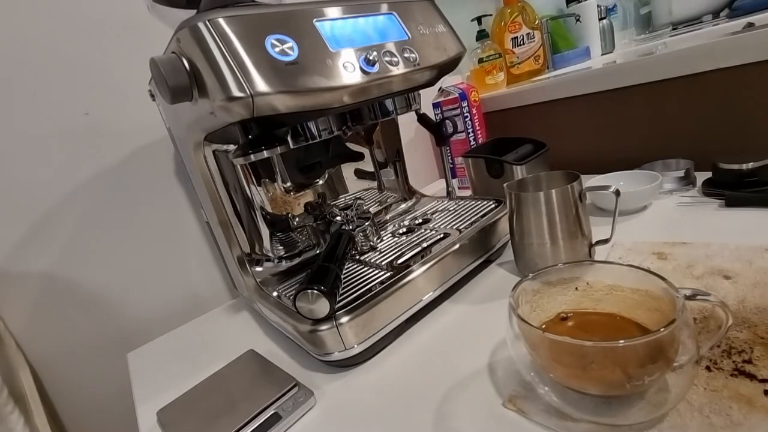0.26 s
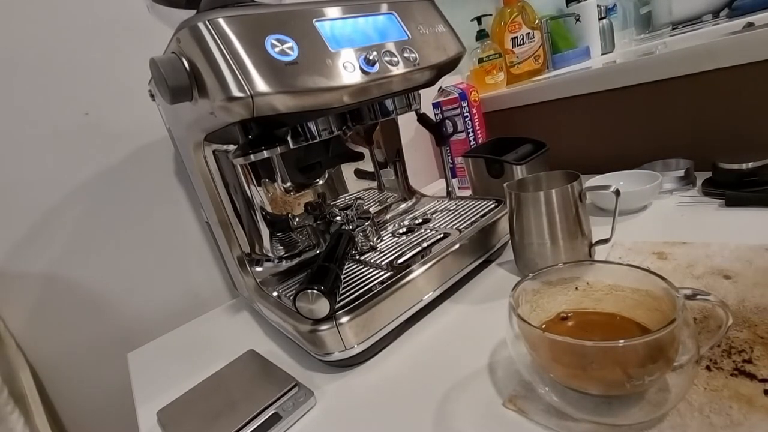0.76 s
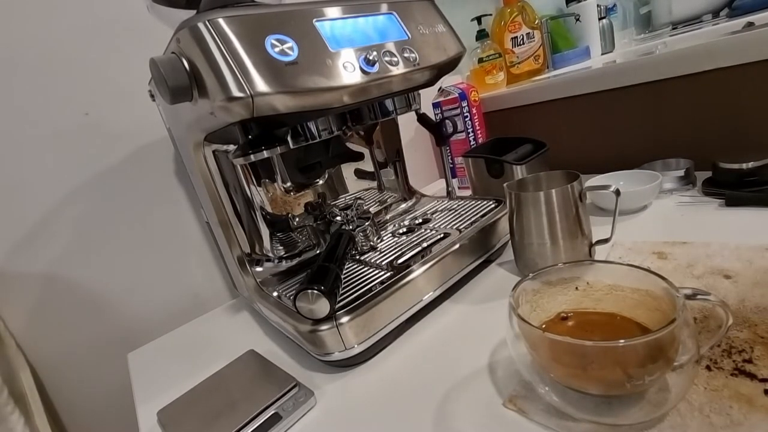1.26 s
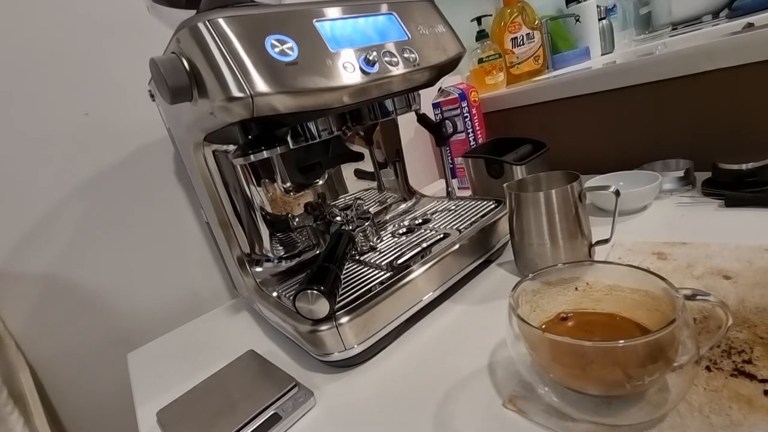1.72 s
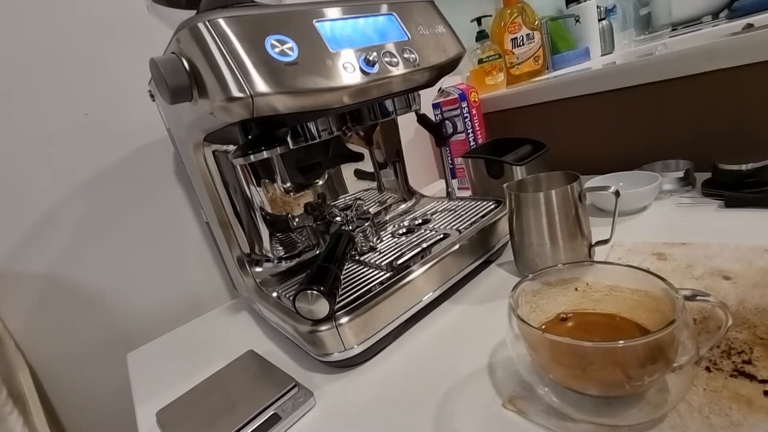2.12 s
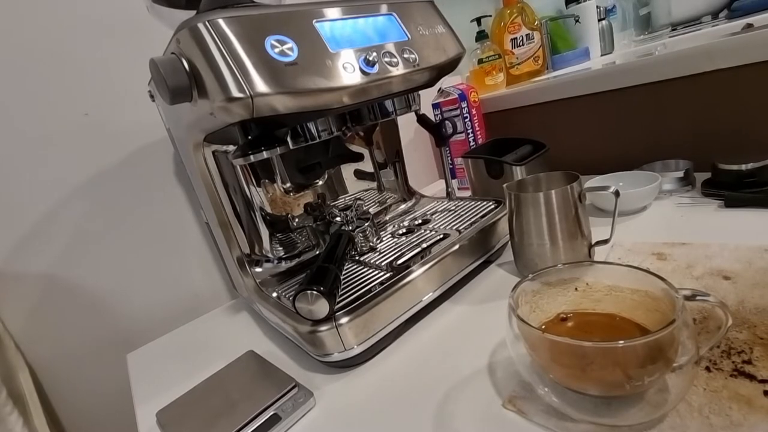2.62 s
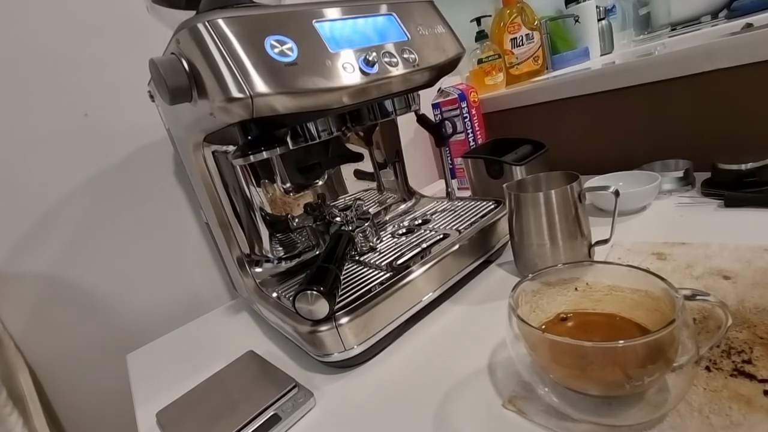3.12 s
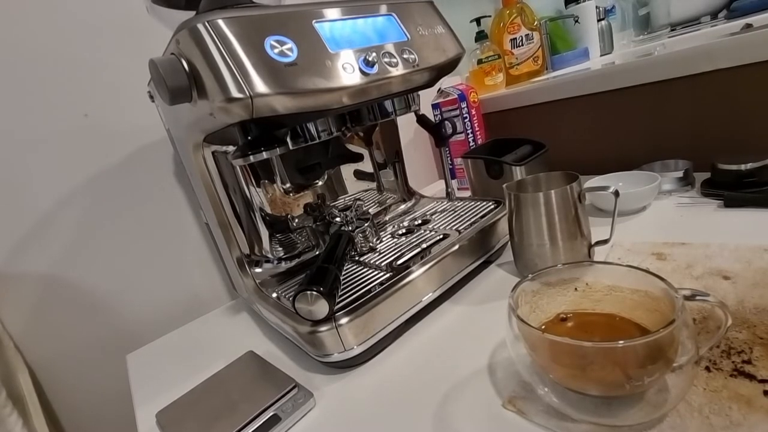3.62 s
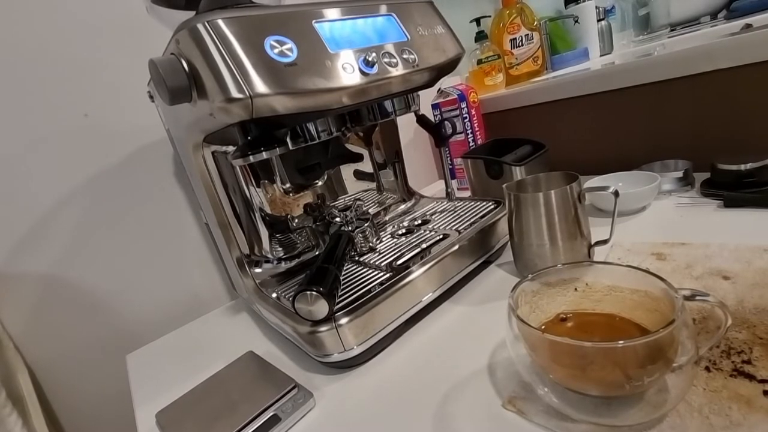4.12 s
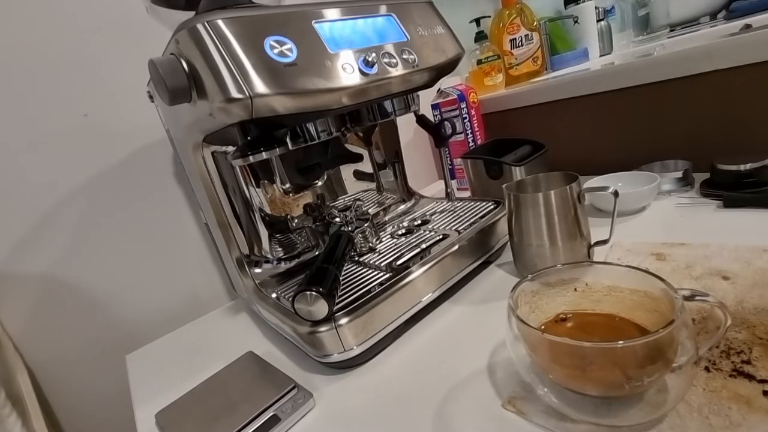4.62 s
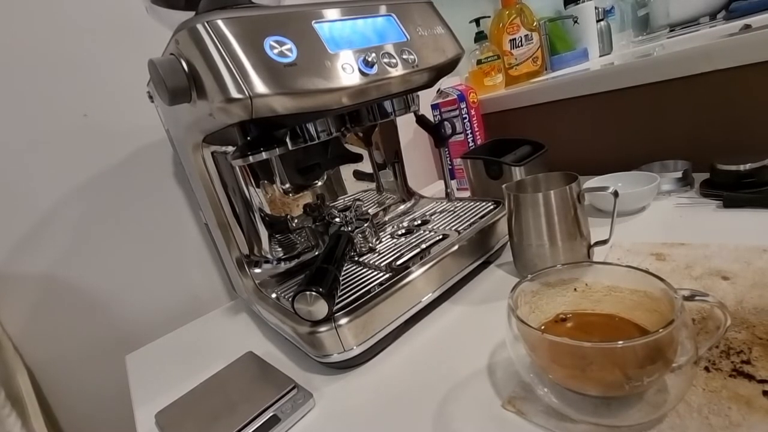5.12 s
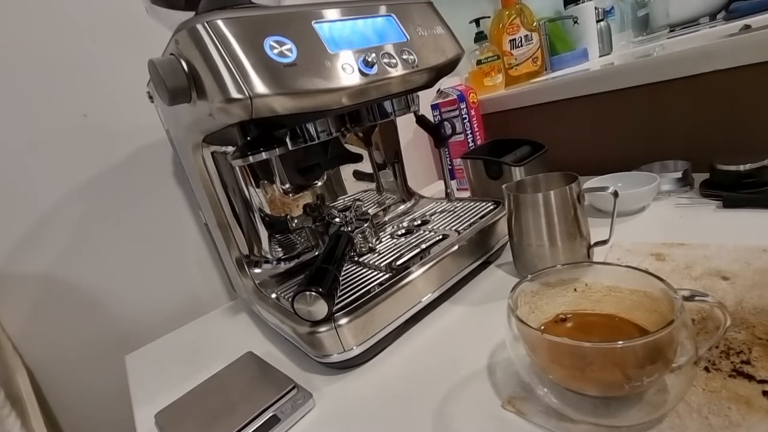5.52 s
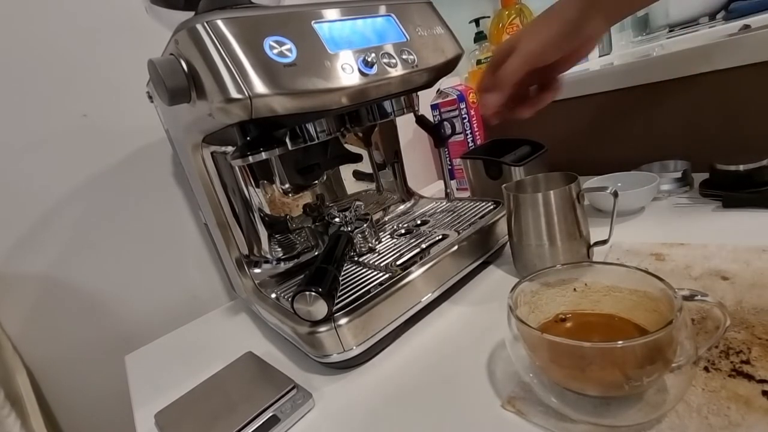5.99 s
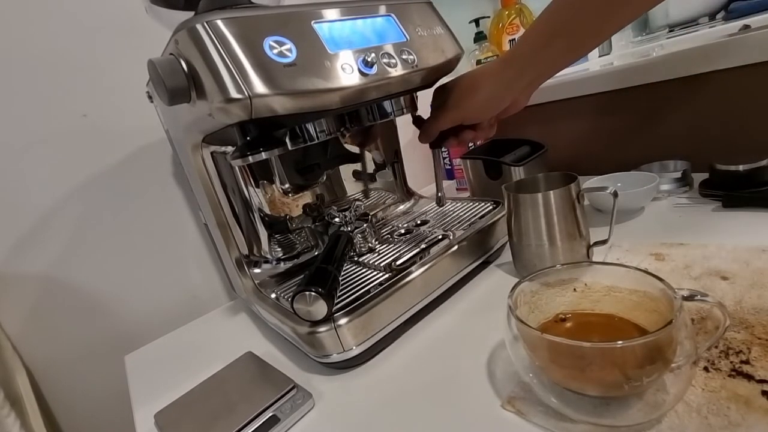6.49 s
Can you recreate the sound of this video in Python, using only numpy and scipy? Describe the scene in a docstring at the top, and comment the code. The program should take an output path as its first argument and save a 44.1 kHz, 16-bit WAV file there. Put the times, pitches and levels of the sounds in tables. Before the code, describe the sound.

Close in a kitchen, rattly metallic pump knocks pulse steadily as wet steam sputters grow denser and finally break into a roaring, bright hiss.

```python
"""A kitchen counter, where an espresso machine heats up. Its pump knocks twice a second as contacts strike
a ringing casing. Bubbles in the heater simmer as lumpy low noise under a breathy whine, and hot metal ticks.
The wand seeps and spits more and more often, shaped noise and ringing drops in the resonances of its pipe,
and at last it blows a loud jet of steam. Steady air noise and a mains hum lie quietly behind."""
import sys
import numpy as np
from scipy import signal
from scipy.fft import rfft, irfft, next_fast_len
from scipy.io import wavfile

SR = 44100
rng = np.random.default_rng(int(sys.argv[2]) if len(sys.argv) > 2 else 0)


def generate_wav(signal):
    """Clip the signal to [-1, 1] and save it as 16-bit WAV at the path in sys.argv[1]."""
    frames = np.transpose(np.atleast_2d(signal))
    scaled = np.clip(frames, -1, 1) * 32767
    pcm = np.round(scaled).astype(np.int16)
    wavfile.write(sys.argv[1], SR, pcm)


def boost_factor(decibels):
    """Convert a level in decibels to a linear amplitude factor."""
    exponent = np.asarray(decibels, float) / 20
    return 10 ** exponent


N = 297675
TIME = np.arange(N) / SR
SIDES = np.array([[1], [-1]])   # left, right

# Noise tones give only the shape of a spectrum: the noise is levelled afterwards.
# Balances are left over right.

# Pump
FIRST_STROKE_S, STROKE_EVERY_S, STROKE_DB = 1.469, 0.50037, -32.5
# delay of the piston's return by back pressure, stroke by stroke: late_ms
RETURN_LATE_MS = [6.19, 3, 2.97, 2.43, 6.6, 4.58, 6, 5.6, 5.98, 5.44, 5.14]
# contacts in one stroke: after_start_ms, signed push on the casing, knock_db, tick_db, share of the delay (0-1)
CONTACTS = [(1.97, -0.73, -2.5, -10.5, 0.19), (6.03, 0.07, 2, -31, 0.05), (13.31, 0.47, -0.5, -24, 0.14),
            (21.03, -1.19, 4.5, -12, 0.13), (27.18, 1, 2.5, -39, 0.94), (38.22, -0.18, -4, -25.5, 0.24),
            (47.45, 1, -7.5, -30, 0.14), (56.06, -0.17, -3, -40, 0.66), (63.05, 0.74, -7.5, -37, 0.11)]
# low thump of the casing, driven by the pump coil: pitch_hz, level_db, t60_s
CASING_MODES = [(48, 0, 0.061), (94.5, -9, 0.23)]
# ringing panels: pitch_hz, level_db, t60_s
PANEL_MODES = [(146, -18.5, 0.12), (191.6, -15, 0.18), (222, -9, 0.2), (259, -18.5, 0.088),
               (289.8, -13, 0.12), (364, -13.5, 0.12), (421.2, -9, 0.26), (479, -8.5, 0.058),
               (552.6, -9, 0.074), (616, -2.5, 0.027), (707, -8.5, 0.062), (747, -8, 0.041),
               (854, -16.5, 0.077), (967, -15, 0.024), (1117, -23.5, 0.1), (1270, -25.5, 0.081),
               (1443, -28.5, 0.092), (1744, -23, 0.063)]
# valve rattle: freq_hz, level_db (per Hz)
VALVE_TONE = [(200, -10), (600, 4.5), (1100, 7), (2000, 0.5), (4000, 4.5), (5500, -1.5), (8000, -6.5),
              (15000, -15.5)]
# pump balance: freq_hz, balance_db
PUMP_BALANCE = [(60, -8.5), (110, 8.5), (200, -12), (380, 0), (700, -4), (1290, -2), (2380, -2), (4400, -4),
                (8120, 0.0), (15000, 0.0)]
# water hammer as the piston returns; its level is over the stroke strength
HAMMER_AFTER_MS, HAMMER_HZ, HAMMER_SWELL_MS, HAMMER_DB = 20.5, 590, 4.5, 3

# Wand
# steam leaving the wand: time_s, rush_db in the pipe, fizz_db at the tip
STEAM_LEVELS = [(0.0, -59.5, -47), (0.09, -60.5, -62.5), (0.3, -65.5, -70.5), (0.48, -75.5, -81),
                (0.8, -76.5, -80), (1.1, -85, -80), (1.26, -73.5, -77), (2.3, -69.5, -75.5),
                (2.9, -64, -72), (3.8, -60.5, -70), (4.15, -59, -67), (4.9, -61, -68.5),
                (5.2, -58.5, -65.5), (6.3, -58.5, -64.5)]
# spits of water: start_s, rush_db, fizz_db, gurgle_db, t60_s
SPITS = [(0.353, -57.5, -69, -68, 0.041), (1.217, -51, -71, -51.5, 0.061), (2.778, -52.5, -60, -54.5, 0.27),
         (2.865, -50, -67, -47.5, 0.065), (3.0094, -56, -47, -40, 0.064), (3.04, -55, -57, -46.5, 0.17),
         (3.0794, -54, -72, -59, 0.06), (3.167, -56.5, -62, -44, 0.049), (3.228, -56, -52, -50.5, 0.13),
         (3.2504, -55, -43, -61, 0.049), (3.268, -55, -52, -54, 0.07), (3.584, -48, -76, -44.5, 0.067),
         (3.6986, -50, -59, -41, 0.061), (3.878, -42.5, -52, -67, 0.15), (3.921, -56, -62, -49, 0.27),
         (4.0474, -49, -64, -47, 0.051), (4.13, -40, -48, -47, 0.059), (4.1835, -49.5, -54, -51, 0.12),
         (4.213, -49, -73, -61, 0.1), (4.327, -50.5, -47, -52, 0.1), (4.352, -49, -57, -56, 0.063),
         (4.6194, -61, -49, -54, 0.03), (4.6994, -58, -63, -40.5, 0.066), (4.928, -51, -67, -47, 0.081),
         (5.102, -54, -63, -45.5, 0.075), (5.1562, -50, -55, -52, 0.05), (5.1994, -43, -53, -45, 0.11),
         (5.2394, -54, -56, -56, 0.095), (5.3414, -42, -71, -45, 0.033), (5.3795, -40.5, -52, -41.5, 0.071),
         (5.431, -43, -64, -47, 0.048), (5.576, -46, -67, -48.5, 0.14), (5.659, -40, -52, -46.5, 0.092),
         (5.6836, -47, -51, -50, 0.075), (5.852, -49, -57, -45.5, 0.19), (6.1055, -51, -52, -56, 0.08),
         (6.1953, -49.5, -52, -45, 0.083), (6.2594, -50, -68, -50, 0.082), (6.336, -42, -43, -43, 0.046)]
# rush of a spit: freq_hz, level_db (per Hz)
RUSH_TONE = [(590, -36), (1000, -25), (1310, -4), (1540, -13), (1770, -2.5), (2030, -2.5), (3120, -2),
             (4340, -3.5), (5700, -9), (6440, -5), (8500, -10.5), (11000, -50), (18700, -120)]
# smooth seep of steam: freq_hz, level_db (per Hz)
SEEP_TONE = [(590, -29), (1000, -0.5), (1080, -4), (1200, -17), (1490, -8), (1750, -17), (2870, -12),
             (3230, -8), (5030, -17.5), (11000, -26.5), (14300, -67), (22000, -120)]
# fizz at the tip: freq_hz, level_db (per Hz)
FIZZ_TONE = [(6000, -3.5), (8500, -9), (10000, -6.5), (11000, -6.5), (13500, 0), (15500, -5)]
# gurgling slugs of water: freq_hz, level_db (per Hz)
GURGLE_TONE = [(300, -32), (450, 2.5), (600, 5), (800, 4), (1300, -14.5), (1800, -13), (2600, -4.5),
               (4000, -47)]
# wand resonances, as strong as in a spit: centre_hz, width_hz, lift_db
PIPE = [(1310, 150, 5), (2290, 200, 6), (2970, 90, 5), (3250, 300, 8), (5200, 250, 5), (6450, 400, 8),
        (7600, 200, 3), (9630, 100, 3)]
# steam balance: freq_hz, balance_db
STEAM_BALANCE = [(60, -3.5), (130, -1.5), (290, -10), (640, -1), (1410, 2), (3100, -1), (6820, -1),
                 (15000, 1)]
# each pump stroke drives a surge through the pipe; its level is relative to the rush
SURGE_DB, SURGE_RISE_S, SURGE_T60_S = -6, 0.018, 0.56
SPIT_RISE_S, GURGLE_RISE_S = 0.0066, 0.0065
GURGLE_LASTS = 2.16   # the gurgle outlasts its spit by this factor
# typical rate of drops, cycles each rings down 60 dB, level of the smallest relative to the flow
DROPS_PER_S, DROP_CYCLES, DROPS_DB = 500, 70, -2

# Steam jet
# full jet: time_s, roar_db, hiss_db
JET_LEVELS = [(6.27, -100, -110), (6.31, -48, -90), (6.334, -38, -75), (6.342, -42, -51.5),
              (6.478, -39, -41.5), (6.534, -45.5, -51), (6.574, -40, -47), (6.674, -37.5, -31.5),
              (6.722, -40, -37.5), (6.75, -39, -33.5)]
# roar of the jet: freq_hz, level_db (per Hz)
JET_TONE = [(530, -30), (900, -0.5), (1200, -17), (1320, 2), (1650, -13), (2080, -1.5), (3300, 1),
            (4590, 0.5), (5050, 1.5), (9000, -13.5), (11700, -57), (19800, -120)]
# hiss at the tip: freq_hz, level_db (per Hz)
HISS_TONE = [(5000, -20), (7000, 5), (8500, -2), (9800, 2), (10800, -1), (12000, 2.5), (14000, 1),
             (16000, -1)]

# Heater
# simmering water: time_s, level_db
SIMMER_LEVEL = [(0.0, -53), (0.17, -57.5), (1.02, -63.5), (1.67, -56.5), (2.48, -54.5), (2.84, -58),
                (3.6, -55), (4.3, -53), (5.47, -52.5), (6.28, -53.5), (6.47, -50), (6.75, -51)]
# simmer: freq_hz, level_db (per Hz)
SIMMER_TONE = [(88, -64), (150, -30), (220, -10), (334, -7.5), (399, 9), (450, 0.5), (788, -12),
               (1180, -11.5), (1300, -30), (2600, -12), (3380, -44), (5720, -120)]
# resonances of the housing: centre_hz, width_hz, lift_db
SIMMER_PEAKS = [(215, 27, 14), (411, 130, 0.5), (536, 93, 8), (772, 170, 10.5)]
# narrow whine of the heater: freq_hz, level_db (per Hz)
WHINE_TONE = [(1450, -34), (1620, -12), (1720, -1), (1800, 0), (1880, -2), (1980, -12), (2200, -34),
              (3000, -70)]
# middle level of the fluttering whine: time_s, level_db
WHINE_LEVEL = [(0, -72), (.2, -64), (.5, -72), (1.1, -72), (1.5, -67), (2.4, -63.5), (4, -60.5),
               (6.75, -60.5)]
WHINE_FLUTTER_DB = 2.5
# ticks of hot metal: start_s, level_db
METAL_TICKS = [(0.04, -46), (0.0762, -51), (0.314, -47), (0.4, -55), (0.6447, -49.5), (0.7665, -48),
               (1.219, -48), (2.9013, -53), (3.4022, -54)]
# metal ticks: freq_hz, level_db (per Hz)
METAL_TICK_TONE = [(2500, -11), (4500, 1), (6500, 0), (9000, -7.5), (12000, -3), (15500, 1)]
# dull puffs and a knock in the heater early on: start_s, level_db
PUFFS = [(0.101, -48.5), (0.15, -40.5), (0.179, -58), (0.2094, -52), (0.2937, -57)]
# puffs: freq_hz, level_db (per Hz)
PUFF_TONE = [(250, -17), (420, 7), (700, -8), (1400, -20), (1800, -7.5), (2600, -12.5), (3500, -22),
             (5500, -26), (8000, -70)]
METAL_TICK_T60_S, PUFF_T60_S = 0.034, 0.14
# typical rate of larger bubbles, cycles each rings down 60 dB, level of the smallest relative to the simmer
BLIPS_PER_S, BLIP_CYCLES, BLIPS_DB = 25, 11.3, -1

# Room
# background air: freq_hz, level_db (per Hz)
ROOM_TONE = [(18, 17.5), (30, -8.5), (55, 1.5), (69, -11), (103, -1), (124, -15), (160, -14.5), (220, -8),
             (301, -7), (662, -17.5), (775, -32), (907, -15.5), (1010, -20.5), (4260, -43), (5250, -34.5),
             (5830, -44), (15800, -104)]
# room balance: freq_hz, balance_db
ROOM_BALANCE = [(60, -2.5), (180, -2.5), (550, -3.5), (1650, 1.5), (4970, -7), (15000, -24)]
# how alike noise is at the two ears: freq_hz, likeness (1 = the same)
LIKENESS = [(60, 1), (180, 1), (550, 0.27), (1650, 0), (4970, -0.13), (15000, 0.0)]
ROOM_DB, HUM_HZ, HUM_DB = -54, 100, -68.5
KITCHEN_T60_S, NEARBY_T60_S = 0.3, 0.13


def pump():
    """Each stroke is the same run of contacts; they thump the casing, ring the panels and tick the valve."""
    start_s = stroke_times()[:, None]
    late_ms = np.array(RETURN_LATE_MS)[:, None]
    stroke_db = STROKE_DB + rng.normal(0, 0.66, start_s.shape)
    after_ms, push, knock_db, tick_db, share = np.transpose(CONTACTS)
    contact_s = start_s + (after_ms + share * late_ms) / 1000
    at = (contact_s * SR).astype(int)
    out = np.zeros((2, N))
    struck = [(mode, push) for mode in CASING_MODES] + [(mode, boost_factor(knock_db)) for mode in PANEL_MODES]
    for k, ((hz, db, t60), force) in enumerate(struck):
        way = (-1) ** k if k > 1 else 1   # neighbouring panel modes start in opposite directions
        uneven_db = rng.normal(0, 1.8 if k > 1 else 0.7, at.shape)
        clicks = np.zeros(N)
        clicks[at] = way * force * boost_factor(stroke_db + db + uneven_db)
        rung = ring(clicks, hz, t60)
        # panels face different ways: the ears differ in phase
        lag = int(0.22 * (k % 3 - 1) * (k > 2) * SR / hz)
        out += boost_factor(SIDES * at_hz(PUMP_BALANCE, hz) / 2) * [rung, np.roll(rung, lag)]
    ticks = bursts(contact_s.ravel(), (stroke_db + tick_db).ravel(), 0.07, 0.0017)
    age = TIME[:SR // 10]
    swell = age * 1000 / HAMMER_SWELL_MS
    hammer = swell * np.exp(1 - swell) * np.cos(2 * np.pi * HAMMER_HZ * age)
    side_db = SIDES * at_hz(PUMP_BALANCE, HAMMER_HZ) / 2
    for hammer_s, db in zip(start_s + (HAMMER_AFTER_MS + late_ms) / 1000, stroke_db):
        i = int(hammer_s[0] * SR)
        out[:, i:i + len(hammer)] += boost_factor(db + HAMMER_DB + side_db) * hammer
    return out + ticks * noise(VALVE_TONE, STEAM_BALANCE)


def stroke_times():
    """The pump starts its strokes at a steady pace."""
    return FIRST_STROKE_S + STROKE_EVERY_S * np.arange(len(RETURN_LATE_MS))


def wand():
    """Steam seeps smoothly and fizzes at the tip; slugs of water gurgle, ring the pipe and burst out as spits."""
    rush_db, fizz_db = in_time(STEAM_LEVELS)
    surges = bursts(stroke_times(), SURGE_DB, SURGE_T60_S, SURGE_RISE_S)
    rush = boost_factor(rush_db) * (1 + surges)
    start_s, spit_db, spit_fizz_db, gurgle_db, t60 = np.transpose(SPITS)
    spits = bursts(start_s, spit_db, t60, SPIT_RISE_S)
    fizz = boost_factor(fizz_db) + bursts(start_s, spit_fizz_db, t60, SPIT_RISE_S)
    gurgle = bursts(start_s, gurgle_db, GURGLE_LASTS * t60, GURGLE_RISE_S)
    faint_pipe = np.multiply(PIPE, [1, 1, 0.2])
    out = rush * noise(SEEP_TONE, STEAM_BALANCE, faint_pipe, patchy_db=2.2)
    out = out + spits * noise(RUSH_TONE, STEAM_BALANCE, PIPE, patchy_db=2.5)
    out = out + droplets(spits + boost_factor(-6.0) * rush)
    out = out + fizz * noise(FIZZ_TONE, STEAM_BALANCE)
    return out + gurgle * noise(GURGLE_TONE, ROOM_BALANCE)


def droplets(flow):
    """Drops burst in clumps inside the wand and ring its resonances briefly."""
    born = rng.random(N) < DROPS_PER_S * boost_factor(6 * drift(25)) / SR
    size_db = 2.5 * np.minimum(rng.exponential(1, N), 3)
    clicks = born * boost_factor(size_db) * rng.choice([-1, 1], N) * flow
    dealt = rng.integers(0, len(PIPE), N)   # which resonance each drop rings
    out = np.zeros((2, N))
    for k, (hz, width, lift) in enumerate(PIPE):
        rung = ring(clicks * (dealt == k), hz, DROP_CYCLES / hz) * boost_factor(at_hz(RUSH_TONE, hz) + lift)
        out += [rung, np.roll(rung, 3 + 5 * k)]
    return boost_factor(DROPS_DB) * out


def jet():
    """Dry steam breaks through: a broad roar, its pipe resonances standing out half as much, and a bright hiss."""
    roar_db, hiss_db = in_time(JET_LEVELS)
    halved_pipe = np.multiply(PIPE, [1, 1, 0.5])
    roar = boost_factor(roar_db) * noise(JET_TONE, STEAM_BALANCE, halved_pipe, patchy_db=2.6, scatter=0.4)
    hiss = boost_factor(hiss_db) * noise(HISS_TONE, STEAM_BALANCE, patchy_db=1.0, scatter=0.4)
    return roar + hiss


def heater():
    """Collapsing bubbles make lumpy low noise in the housing resonances and a breathy whine; hot metal ticks."""
    simmer_db, whine_db = in_time(SIMMER_LEVEL)[0], in_time(WHINE_LEVEL)[0]
    ticks = bursts(*np.transpose(METAL_TICKS), METAL_TICK_T60_S, 0.00042)
    puffs = bursts(*np.transpose(PUFFS), PUFF_T60_S, 0.0014)
    whine = boost_factor(whine_db + WHINE_FLUTTER_DB * drift(30))
    out = boost_factor(simmer_db) * noise(SIMMER_TONE, ROOM_BALANCE, SIMMER_PEAKS, patchy_db=1.9)
    out = out + blips(simmer_db)
    out = out + whine * noise(WHINE_TONE, ROOM_BALANCE, scatter=0)
    out = out + ticks * noise(METAL_TICK_TONE, STEAM_BALANCE)
    return out + puffs * noise(PUFF_TONE, ROOM_BALANCE)


def blips(simmer_db):
    """Larger bubbles ring for about a dozen cycles, each at one of twelve pitches, the low ones louder."""
    born = rng.random(N) < BLIPS_PER_S * boost_factor(4 * drift(8)) / SR
    clicks = born * boost_factor(simmer_db + BLIPS_DB + 5.5 * np.minimum(rng.exponential(1, N), 3))
    pitches_hz = np.geomspace(560, 1400, 12)
    dealt = rng.integers(0, 12, N)
    rung = sum(ring(clicks * (dealt == k), hz, BLIP_CYCLES / hz) * 700 / hz for k, hz in enumerate(pitches_hz))
    soft = signal.lfilter(np.hanning(40) / 20, 1, rung)   # rounds off the attacks
    return soft * boost_factor(-1.5 * SIDES)


def room():
    """Steady background air and a wavering mains hum, the hum stronger on the right."""
    hum = boost_factor(HUM_DB + 1.3 * drift(35)) * np.sin(2 * np.pi * HUM_HZ * TIME)
    return boost_factor(ROOM_DB) * noise(ROOM_TONE, ROOM_BALANCE) + hum * boost_factor(-2.5 * SIDES)


def kitchen(x):
    """Echo of the walls: eight feedback delays a side, duller on every round."""
    size = next_fast_len(N + SR)
    hz = np.arange(size // 2 + 1) * SR / size
    echoes = np.zeros((2, len(hz)), complex)
    for k, lag_s in enumerate(rng.uniform(0.0055, 0.03, 16)):
        loss = boost_factor(-60 * lag_s / KITCHEN_T60_S * (0.5 + hz / 5000))
        loop = loss * np.exp(-2j * np.pi * hz * lag_s)
        echoes[k % 2] += loop / (1 - loop) * (-1) ** (k // 2)
    return irfft(echoes * rfft(x, size), size)[:, :N]


def noise(tone, balance, peaks=(), patchy_db=0, scatter=0.97):
    """Stereo noise of rms 1; nearby surfaces comb it for each ear; bands flicker together and alone."""
    hz = np.arange(N // 2 + 1) * SR / N
    db = at_hz(tone, hz) - 40 * (hz < tone[0][0])
    for centre, width, lift in peaks:
        db = db + lift / (1 + (2 * (hz - centre) / width) ** 2)
    alike = np.clip(at_hz(LIKENESS, hz), 0, 1)
    bounce = rng.standard_normal((2, SR // 4)) * boost_factor(-60 * TIME[:SR // 4] / NEARBY_T60_S)
    shared, apart = rfft(bounce, N) / np.sqrt(np.sum(bounce ** 2) / 2)
    wet = scatter * (1 - alike)
    shared = (1 + wet * shared) / np.sqrt(1 + wet ** 2)
    ears = np.sqrt(1 + alike) * shared + SIDES * np.sqrt(1 - alike) * apart
    both = rfft(rng.standard_normal(N)) * ears * boost_factor(db + SIDES * at_hz(balance, hz) / 2)
    if patchy_db:
        band = np.floor(1.5 * np.log2(hz / 200 + 1))
        together, out = drift(25), 0
        for k in range(int(band.max()) + 1):
            out = out + irfft(both * (band == k), N) * boost_factor(patchy_db * (0.81 * together + drift(30)))
    else:
        out = irfft(both, N)
    return out / np.sqrt(np.mean(out ** 2))


def ring(clicks, hz, t60):
    """A resonator: a unit click sets a sine of about height 1 ringing, which dies away over t60 seconds."""
    r, w = boost_factor(-60 / (t60 * SR)), 2 * np.pi * hz / SR
    return signal.lfilter([0, np.sin(w)], [1, -2 * r * np.cos(w), r * r], clicks + 1e-18)


def bursts(starts, levels_db, t60s, rises_s):
    """Envelope of sudden puffs that die away; the rise takes a little off each level."""
    out = np.zeros(N)
    for start_s, db, t60, rise in np.broadcast(starts, levels_db, t60s, rises_s):
        i = int(start_s * SR)
        age = TIME[:min(SR // 2, N - i)]
        out[i:i + len(age)] += boost_factor(db - 60 * age / t60) * (1 - np.exp(-age / rise))
    return out


def drift(rate):
    """Slow chance: random points, rate of them a second, joined by lines."""
    count = int(N / SR * 60)
    return np.interp(TIME * rate, np.arange(count), rng.standard_normal(count))


def in_time(rows):
    """Columns of a curve table, one value a sample."""
    time_s, *columns = np.transpose(rows)
    return [np.interp(TIME, time_s, c) for c in columns]


def at_hz(points, hz):
    """A spectrum table read on a log frequency axis."""
    freq_hz, values = np.transpose(points)
    return np.interp(np.log(hz + 1), np.log(freq_hz + 1), values)


def scene():
    """Machine near the microphone, its knocks echoed by the walls."""
    knocks = pump()
    echo = boost_factor(-20) * kitchen(knocks.mean(axis=0))
    return knocks + echo + wand() + jet() + heater() + room()


def top_cut(x):
    """Nothing passes above the cut-off."""
    return signal.sosfilt(signal.butter(12, 16620, fs=SR, output="sos"), x)


def record(dry):
    """Small stereo microphone with little deep bass and the top cut steeply."""
    thin = signal.sosfilt(signal.butter(4, 38, "high", fs=SR, output="sos"), dry)
    mix = signal.sosfilt(signal.ellip(12, 0.5, 70, 15900, fs=SR, output="sos"), thin)
    return top_cut(mix)


dry = scene()
out = record(dry)
generate_wav(out)
```